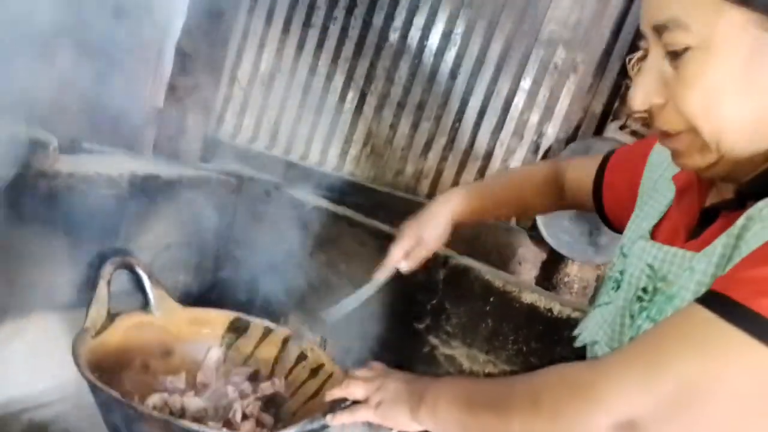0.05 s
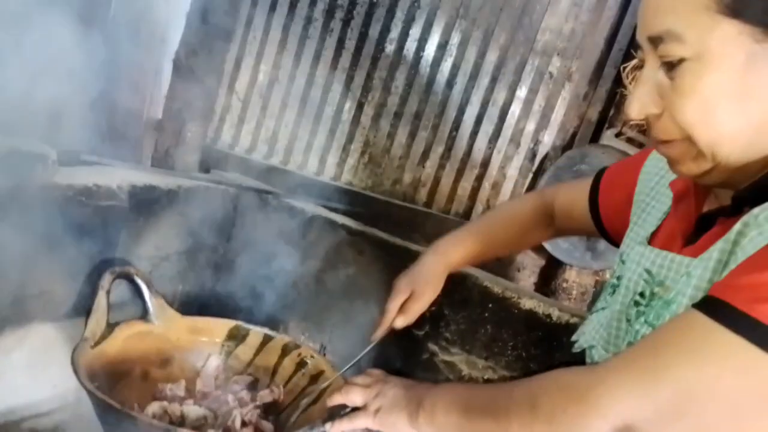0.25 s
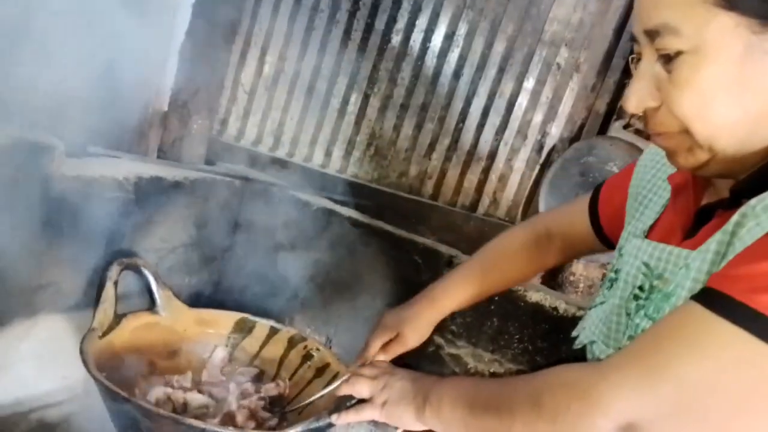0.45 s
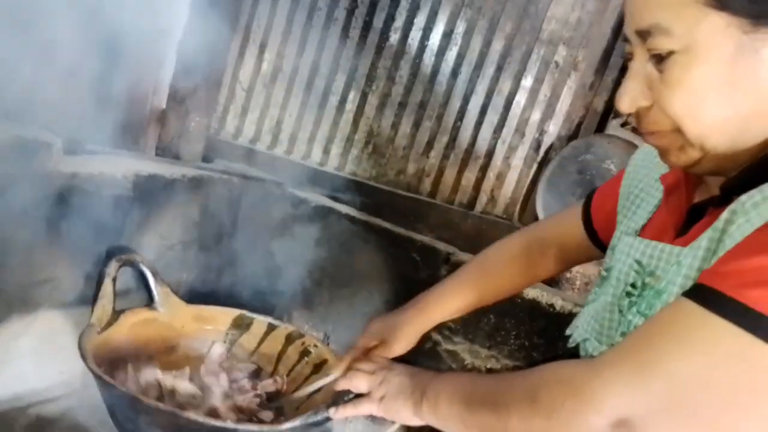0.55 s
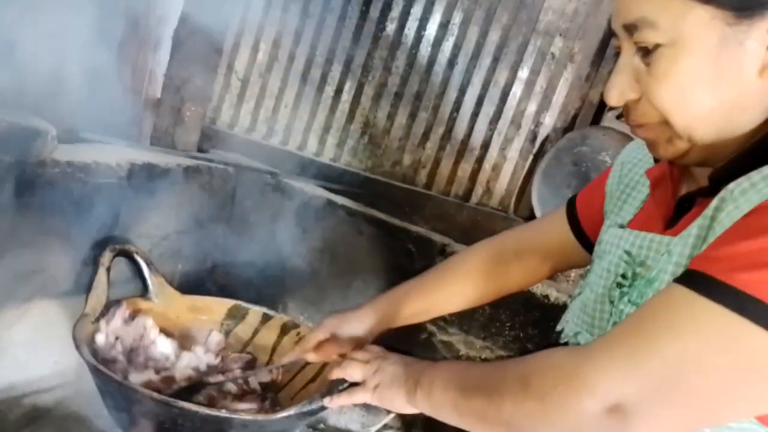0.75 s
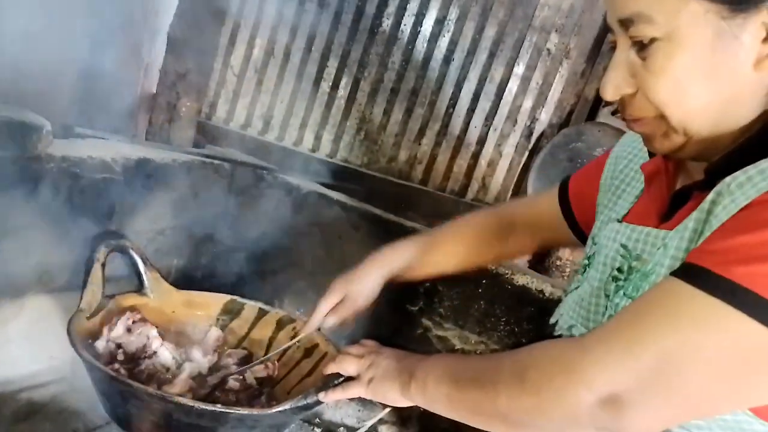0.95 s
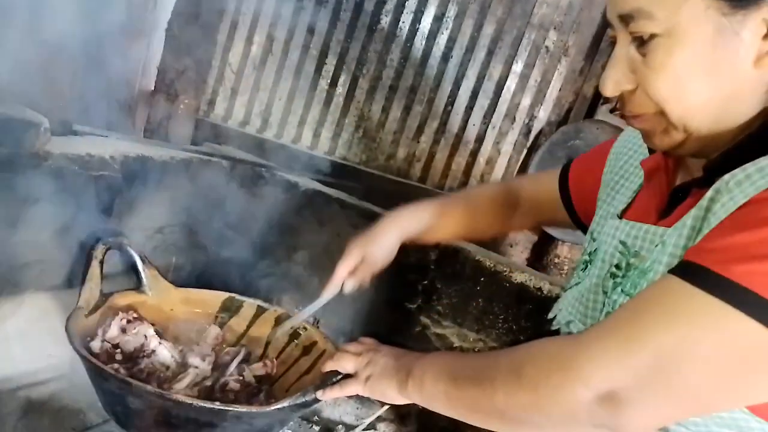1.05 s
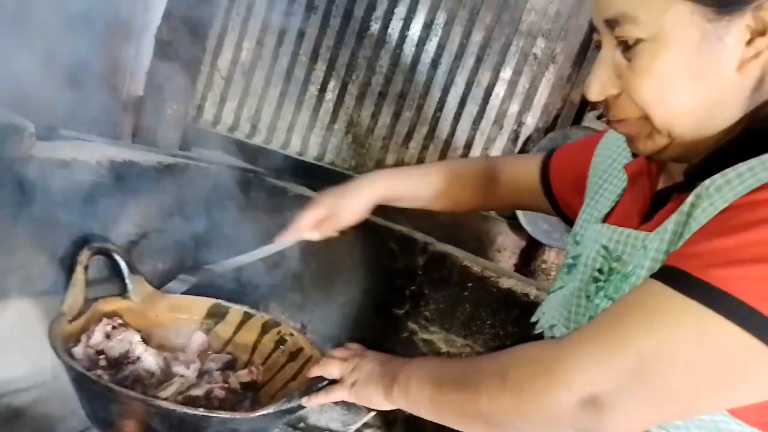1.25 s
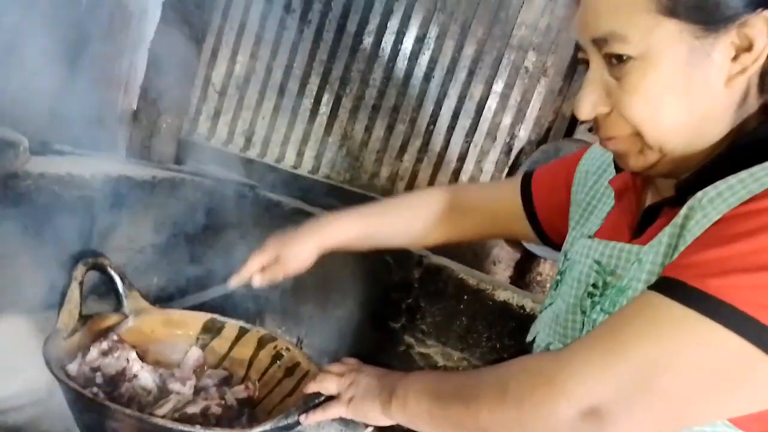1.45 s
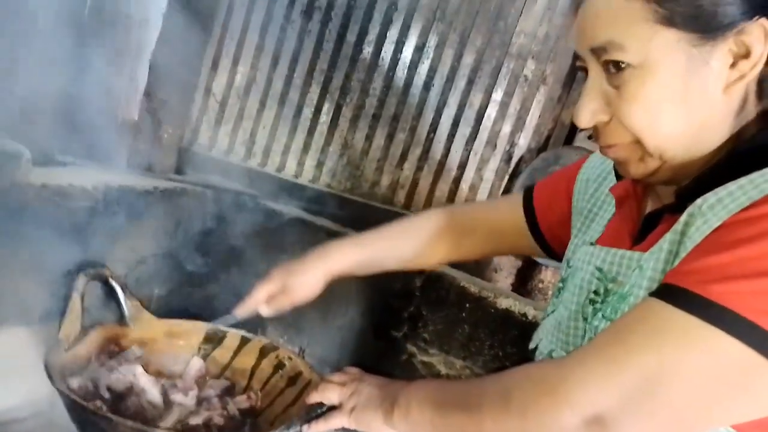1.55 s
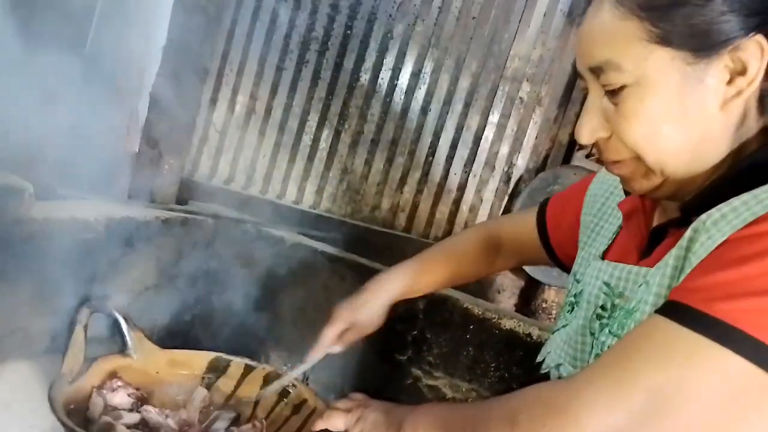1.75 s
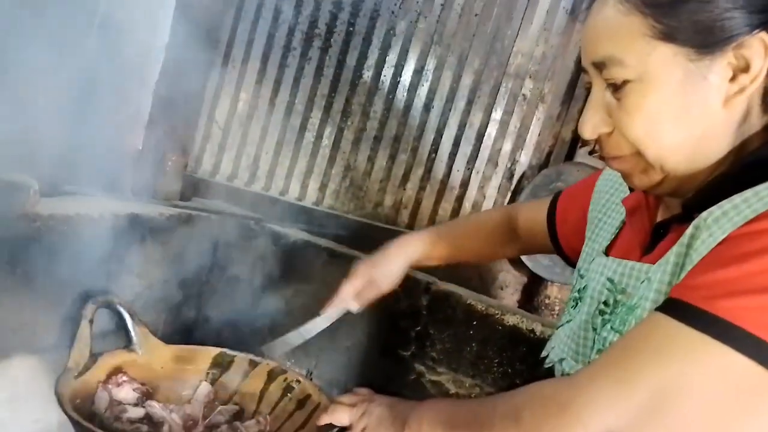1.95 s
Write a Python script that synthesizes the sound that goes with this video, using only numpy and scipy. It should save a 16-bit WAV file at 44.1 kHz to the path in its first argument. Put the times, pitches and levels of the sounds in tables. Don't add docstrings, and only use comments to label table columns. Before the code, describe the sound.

A metal spoon grinds and scratches through sizzling meat in a clay pan, then the frying simmers down

```python
import sys
import numpy as np
from scipy import signal
from scipy.fft import rfft, irfft
from scipy.io import wavfile
from scipy.ndimage import uniform_filter1d

SR = 44100
rng = np.random.default_rng(int(sys.argv[2]) if len(sys.argv) > 2 else 0)


def invert_db(level):
    return 10 ** (np.asarray(level, dtype=float) / 20)


def digitize_waveform(pressure):
    field = np.atleast_2d(pressure).T
    bounded = np.clip(field, -1, 1)
    quanta = np.round(bounded * 32767).astype(np.int16)
    wavfile.write(sys.argv[1], SR, quanta)


N = 88200
T = np.arange(N) / SR
HZ = np.maximum(np.fft.rfftfreq(N, 1 / SR), 1)

# (time [s], level [dB], extra level of the top spits [dB])
FAT_VIGOUR = [(0.0, -46.5, -0.5), (0.24, -48.5, 0), (0.24, -47, -3), (0.5, -33.5, 1), (0.54, -34.5, 0),
              (0.58, -31.5, -6), (0.63, -40, 11), (0.71, -34, 6.5), (0.73, -33, 1), (0.91, -44, 14.5),
              (1.06, -45.5, 0.5), (1.21, -45, 1.5), (1.44, -47.5, 6), (1.47, -44.5, 4), (1.51, -42.5, -9),
              (1.52, -40, -17), (1.64, -48.5, 2.5), (2.0, -53, 8)]
# (frequency [Hz], level [dB])
FAT_TONE = [(200, -20.5), (500, -15.5), (1000, -9), (2000, -7), (3200, -1.5), (7000, 1.5), (11000, -0.76),
            (14000, -1.1)]
# (time [s], level from speed [dB], left over right [dB])
BOWL_SLIDE = [
    (.244, -58, 33),
    (.248, -38.5, -2),
    (.29, -36, -1),
    (.355, -37.5, 1),
    (.4, -34, -5),
    (.5, -38.5, -2),
    (.6, -38, -2.5),
    (.67, -53, -20),
    (.9, -86, 2),
]
# (frequency [Hz], level [dB])
SLIDE_TONE = [(250, -20), (500, -23), (900, -11.5), (1600, -6.5), (2500, -1.5), (3700, 0.5), (4600, -5),
              (7000, -13.5)]
# (time [s], level [dB], left over right [dB])
EDGE_RASP = [
    (.25, -59, -3),
    (.3, -41, 7),
    (.39, -33.5, -6.5),
    (.47, -43, -15.5),
    (.57, -35, -12.5),
    (.67, -33.5, 7.5),
    (.84, -33, 2),
    (.94, -38, 9),
    (1.06, -56, 19),
]
# (time [s], level [dB], left over right [dB])
WALL_RASP = [
    (1.47, -49, -5),
    (1.505, -49, -1),
    (1.52, -40.5, -2),
    (1.55, -45, -9),
    (1.57, -43.5, -12.5),
    (1.66, -44.5, 0.5),
    (1.68, -46, -12.5),
    (1.73, -46.5, 0),
    (1.8, -66, -11),
]
# (frequency [Hz], level [dB])
RASP_TONE = [(5000, -31), (7500, -16.5), (9000, -3), (10500, -4), (11500, -2), (12500, 1.5), (14000, -1)]
# (frequency [Hz], level [dB])
WALL_TONE = [(8000, -32), (9900, -19), (10500, -9), (11000, -5), (11600, -5.5), (12200, -11), (14000, -24)]
# (time [s], level [dB])
SPOON_WEIGHT = [
    (.244, -55),
    (.26, -68),
    (.32, -54.5),
    (.36, -56),
    (.39, -39.5),
    (.5, -35),
    (.62, -51.5),
    (.725, -48),
    (.745, -95),
]
# (time [s], level [dB], length [s], centre [Hz], width [octaves])
SPOON_JOLTS = [(0.081, -39.5, 0.0094, 3870, 5.2), (.249, -29.5, 0.0063, 3400, 0.34),
               (0.391, -37.5, 0.081, 1350, 0.45), (0.398, -45.5, 0.043, 410, 0.46),
               (0.432, -42, 0.032, 1610, 0.87), (0.433, -37.5, 0.13, 2700, 0.043),
               (0.467, -44, 0.027, 480, 3.7), (.5, -35.5, 0.033, 790, 0.72),
               (0.555, -37.5, 0.032, 700, 0.76), (0.592, -40, 0.051, 750, 0.42),
               (0.594, -41.5, 0.032, 399, 0.34), (0.599, -46, 0.041, 2334, 0.056),
               (.632, -48, 0.03, 438, 1.2), (0.704, -51.5, 0.048, 380, 0.59), (0.713, -57, 0.0083, 930, 1),
               (0.799, -55, 0.0071, 3440, 0.32), (0.814, -41, 0.12, 3204, 0.21),
               (0.68, -36.5, 0.083, 8050, 0.18), (0.852, -38, 0.23, 7550, 0.21),
               (1.533, -46.5, 0.062, 1800, 0.22), (1.546, -55, 0.042, 904, 0.5),
               (0.427, -38, 0.021, 2075, 0.11), (0.461, -37.5, 0.017, 2700, 0.14),
               (0.563, -32, .005, 1500, 1.6), (0.25, -36, .003, 4000, 2.5), (0.0, -59.5, 0.048, 820, 0.59),
               (0.705, -63, 0.017, 1060, 0.12), (.705, -34, 0.01, 7550, 0.32),
               (0.831, -38, .004, 10500, .6), (0.886, -34.5, 0.01, 7750, 0.24),
               (.928, -52, 0.0088, 11000, .4), (1.473, -48, 0.035, 7100, 0.12),
               (1.514, -56, .006, 11100, .3), (1.563, -36, 0.011, 10900, .25),
               (1.6, -32, 0.0025, 10900, 0.27), (1.641, -32, 0.0029, 11100, 0.24),
               (1.685, -34, .008, 11100, .25), (1.525, -54, 0.013, 6900, .3),
               (1.744, -56.5, 0.013, 1080, 0.29), (1.836, -51, 0.044, 2400, 2.9),
               (1.96, -61, 0.09, 283, 0.52)]
# (frequency [Hz], width [Hz], level [dB])
PAN_MODES = [(368, 46, -9), (574, 137, -4.5), (696, 25, -1.5), (750, 24.7, 1.5), (1119, 54, 0),
             (1191, 37, -7), (1280, 16, -5), (1663, 21, -1), (1800, 15.4, -4), (2075, 56, 1),
             (2427, 19.7, 1.5), (2700, 61, -3), (3400, 14, -5), (3796, 80, -0.5)]
# (frequency [Hz], width [Hz], level [dB])
SPOON_MODES = [(7180, 150, 18), (7000, 35, -18), (8900, 110, -3), (10400, 330, 9), (11000, 100, 3),
               (10930, 28, 6), (11700, 84, 3)]
# (frequency [Hz], likeness [0-1])
LIKENESS = [(200, 0.31), (800, 0.8), (1500, 0.6), (3500, 0.11), (5200, 0.26), (7000, 0), (14000, 0.05)]
# (frequency [Hz], level [dB])
LEFT_PORT = [(300, -3.5), (3500, 1.5), (5000, -2.5), (6200, 1.5), (7250, 5.5), (8700, -1.5), (11500, -7.5),
             (14100, -31.5)]
# (frequency [Hz], level [dB])
RIGHT_PORT = [(300, -4), (3800, 5.5), (6500, -2), (8100, -4.5), (10000, 2.5), (11200, 6.5), (12300, -4),
              (14100, -11)]
# (start [s], end [s], start frequency [Hz], end frequency [Hz], width [Hz])
DIPS = [(.27, .43, 5300, 4950, 150), (.43, .62, 5350, 5400, 70), (.5, .62, 4850, 4980, 80),
        (.63, .8, 5300, 5300, 90), (.68, .86, 4800, 4750, 70), (.82, .94, 5250, 5300, 150),
        (.94, 1.28, 5200, 5100, 60), (1.28, 1.6, 4950, 5400, 55), (1.61, 1.75, 5050, 5050, 90),
        (1.76, 2.0, 5400, 5100, 60), (.26, .56, 8500, 8250, 60), (.48, .66, 6400, 6300, 60),
        (.55, .98, 5950, 5900, 45), (.44, .62, 4300, 4150, 50), (.55, .73, 2800, 2720, 45),
        (.8, .9, 2350, 2800, 45), (.65, .72, 1260, 1240, 35), (.75, .82, 1050, 1000, 30),
        (.81, 1.08, 1290, 1410, 30), (1.0, 1.14, 2120, 2130, 35), (1.35, 1.42, 2130, 2110, 35),
        (1.15, 1.47, 2620, 2700, 35), (1.53, 1.58, 13400, 13300, 200), (1.62, 1.7, 14200, 14200, 300)]
# (time [s], level [dB])
BUMPS = [
    (.255, -84),
    (.62, -86),
    (1.085, -83),
    (1.67, -90),
]

GRIT_PER_S, GRIT_SPREAD_DB = 3000, 4


def rms_one(x):
    return x / np.sqrt(np.mean(x ** 2) + 1e-20)


def at_hz(points):
    hz, value = np.transpose(points)
    return np.interp(np.log(HZ), np.log(hz), value)


def in_time(rows):
    s, *columns = np.transpose(rows)
    return [np.interp(T, s, column) for column in columns]


def bump(centre_hz, width_hz):
    return np.exp(-((HZ - centre_hz) / width_hz) ** 2)


def drift(rate):
    r = np.exp(-80 * np.pi * rate / SR)
    noise = rng.standard_normal(N // 40 + 2002)
    slow = signal.lfilter([1], [1, -2 * r, r * r], noise)[2000:]
    return np.interp(np.arange(N) / 40, np.arange(len(slow)), rms_one(slow))


def grains(per_s, spread_db):
    size = invert_db(spread_db * np.minimum(rng.exponential(1, (2, N)), 5))
    size = size * rng.choice([-1, 1], (2, N))
    return rms_one(size * (rng.random((2, N)) < per_s / SR))


def patchy(pair, tone, patch_db, together_db):
    spectrum = rfft(pair) * invert_db(at_hz(tone))
    together = drift(12.3) + drift(57)
    out = 0
    for hz in 200 * 2 ** (np.arange(20) / 3):
        band = np.cos(np.pi / 2 * np.clip(3 * np.log2(HZ / hz), -1, 1)) ** 2
        flicker_db = patch_db * drift(13.7) + together_db * together
        out = out + irfft(spectrum * band, N) * invert_db(flicker_db)
    return rms_one(out)


def body(x, modes, dull_db):
    out = invert_db(dull_db) * x
    for k, (hz, width_hz, db) in enumerate(modes):
        r = np.exp(-np.pi * width_hz / SR)
        feed = np.array([1, 0, -1]) * (1 - r * r) / 2
        back = [1, -2 * r * np.cos(2 * np.pi * hz / SR), r * r]
        out = out + (-1) ** k * invert_db(db + 10.5) * signal.lfilter(feed, back, x)
    return out


def clay(x):
    return body(x, PAN_MODES, dull_db=-10)


def stroke_gain(rows, db):
    touching = 1. * (T > rows[0][0]) * (T < rows[-1][0])
    return invert_db(db) * uniform_filter1d(touching, size=90)


def placed(pair, pan_db=0):
    a, b = rfft(pair)
    alike = np.clip(at_hz(LIKENESS), 0, .99)
    both = irfft(np.array([a, alike * a + np.sqrt(1 - alike ** 2) * b]), N)
    return both * invert_db(np.array([[.5], [-.5]]) * pan_db)


def fat():
    db, top_db = in_time(FAT_VIGOUR)
    spits = grains(per_s=9000, spread_db=1.5)
    spits = rfft(patchy(spits, FAT_TONE, patch_db=2.43, together_db=0.59))
    air_db = 7 * bump(910, 49) + 4.5 * bump(1150, 17)
    wall_db = -6 * bump(1350, 157)
    spits = spits * invert_db(air_db + wall_db)
    low = 1 / (1 + (HZ / 3580) ** 4)
    top = 1 / (1 + (9000 / HZ) ** 8)
    low_db = db.mean() + 0.33 * (db - db.mean())
    parts = [(low, low_db), (1 - low - top, db), (top, db + top_db)]
    return placed(sum(invert_db(level_db + 3.0) * irfft(spits * part, N) for part, level_db in parts))


def press():
    db, = in_time(SPOON_WEIGHT)
    dull = signal.butter(2, 1400, fs=SR, output="sos")
    rub = signal.sosfilt(dull, grains(1500, 2.3))
    ringing = clay(rub * invert_db(1.8 * drift(22)))
    return placed(rms_one(ringing + invert_db(-10.0) * rub) * stroke_gain(SPOON_WEIGHT, db))


def rasp(stroke, tone, ring_db):
    db, pan_db = in_time(stroke)
    grit = patchy(grains(12000, 0.98), tone, patch_db=0.44, together_db=0.28)
    metal = body(grit, SPOON_MODES, dull_db=-1.5 - ring_db)
    return placed(stroke_gain(stroke, db) * rms_one(metal), pan_db)


def slide():
    db, pan_db = in_time(BOWL_SLIDE)
    grit = patchy(grains(GRIT_PER_S, GRIT_SPREAD_DB), SLIDE_TONE, patch_db=1.2, together_db=-0.35)
    scrape = rms_one(grit + invert_db(2.5) * rms_one(clay(grit)))
    return placed(stroke_gain(BOWL_SLIDE, db) * scrape, pan_db)


def jolts():
    drive = np.zeros((2, N))
    grit = rfft(grains(GRIT_PER_S, GRIT_SPREAD_DB))
    for s, db, length, hz, octaves in SPOON_JOLTS:
        u = (T - s) / length
        shape = np.exp(-np.where(u < 0, (u / 0.44) ** 2, (u / 0.57) ** 2))
        tone = np.exp(-(np.log2(HZ / hz) / octaves) ** 2 * 2)
        drive += invert_db(db) * shape * rms_one(irfft(grit * tone, N))
    return placed(invert_db(-2.5) * clay(drive) + invert_db(-6.5) * drive)


def scene():
    long_rasp = rasp(EDGE_RASP, RASP_TONE, ring_db=-12.5)
    wall_rasp = rasp(WALL_RASP, WALL_TONE, ring_db=-13.0)
    return fat() + press() + long_rasp + wall_rasp + slide() + jolts()


def dipped(x):
    wander_per_s = 12
    hz, s, z = signal.stft(x, SR, nperseg=1536)
    at = np.minimum(s * SR, N - 1).astype(int)
    for start, end, from_hz, to_hz, width_hz in DIPS:
        glide = np.interp(s, [start, end], [from_hz, to_hz])
        where = glide + .6 * width_hz * drift(wander_per_s)[at]
        depth = (s > start) * (s < end) * np.clip(.9 + .4 * drift(wander_per_s)[at], 0, 1.4)
        z = z * invert_db(-30 * depth * np.exp(-((hz[:, None] - where) / width_hz) ** 4))
    return signal.istft(z, SR, nperseg=1536)[1][:, :N]


def ports(dry):
    left_lag_s, top_hz = .0001, 14400
    notch_db = -4 * bump(5200, 650)
    response = invert_db(np.array([at_hz(LEFT_PORT), at_hz(RIGHT_PORT)]) + notch_db)
    lag = np.exp(-2j * np.pi * HZ * np.array([[left_lag_s], [0]]))
    return irfft(rfft(dry) * response * lag * (HZ < top_hz), N)


def rumble(x):
    noise = rng.standard_normal(N) + 0.56 * rng.standard_normal((2, N))
    deep = rms_one(signal.sosfilt(signal.butter(4, 51.5, fs=SR, output="sos"), noise))
    loudness = uniform_filter1d(np.mean(x ** 2, axis=0), size=4000) / np.mean(x ** 2)
    return invert_db(-82) * deep * np.abs(loudness) ** (0.33 / 2)


def handling():
    thud_hz, thud_s = 121, 0.0147
    out = 0
    for s, db in BUMPS:
        shape = np.exp(-((T - s) / thud_s) ** 2)
        out = out + invert_db(db) * shape * np.sin(2 * np.pi * thud_hz * (T - s))
    return out


def low_pass(x):
    return signal.sosfilt(signal.butter(12, 14400, fs=SR, output="sos"), x)


def record(dry):
    bass_cut = signal.butter(8, 233, "high", fs=SR, output="sos")
    x = signal.sosfilt(bass_cut, dipped(ports(dry)))
    mix = x + handling() + rumble(x)
    return low_pass(mix)


dry = scene()
out = record(dry)
digitize_waveform(out)
```